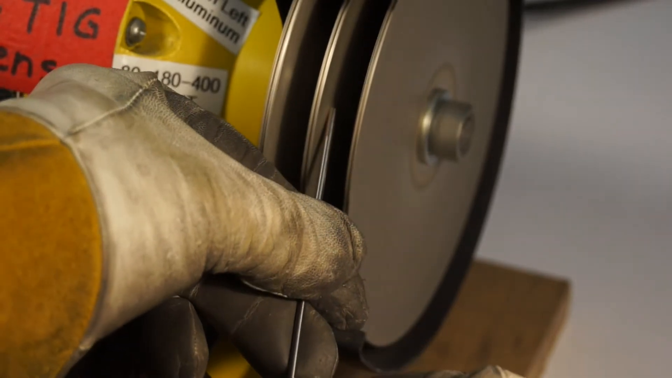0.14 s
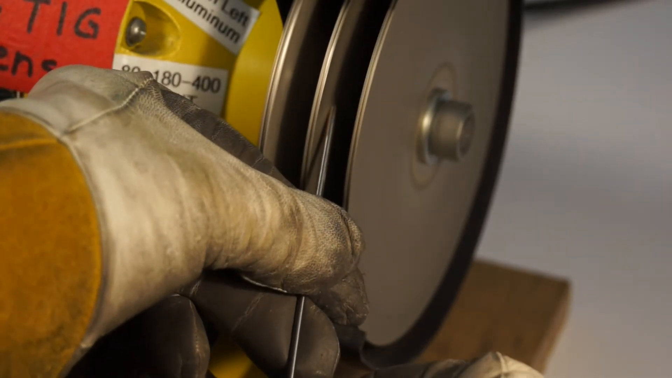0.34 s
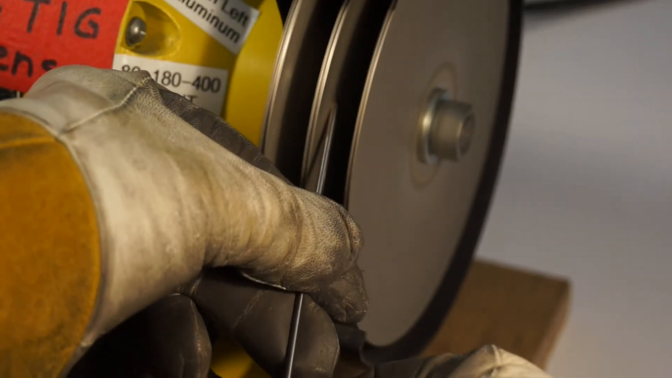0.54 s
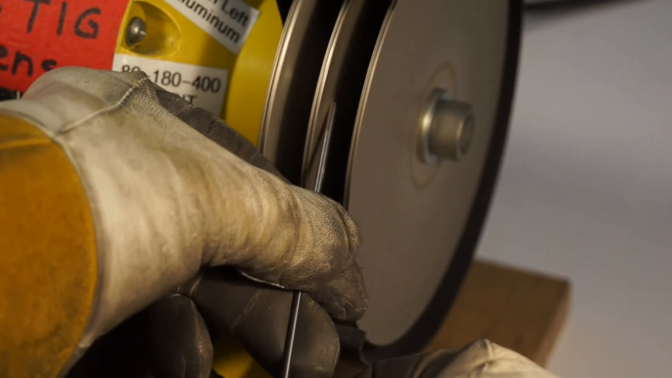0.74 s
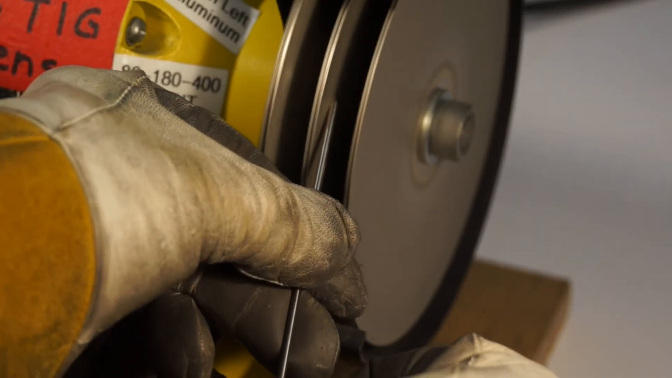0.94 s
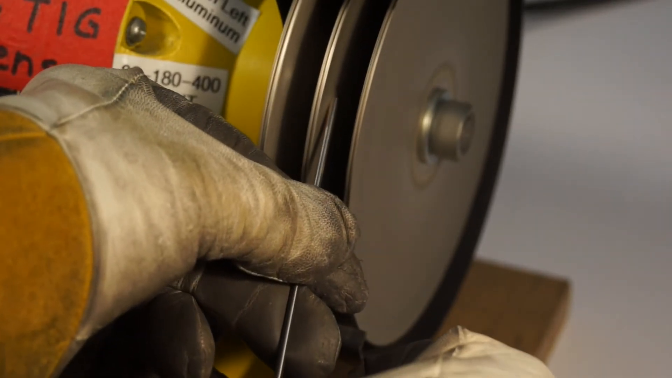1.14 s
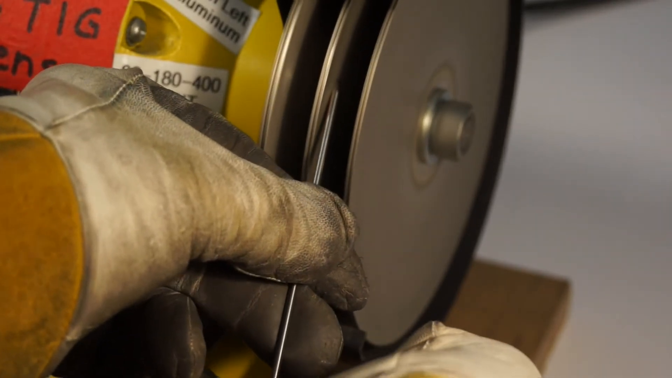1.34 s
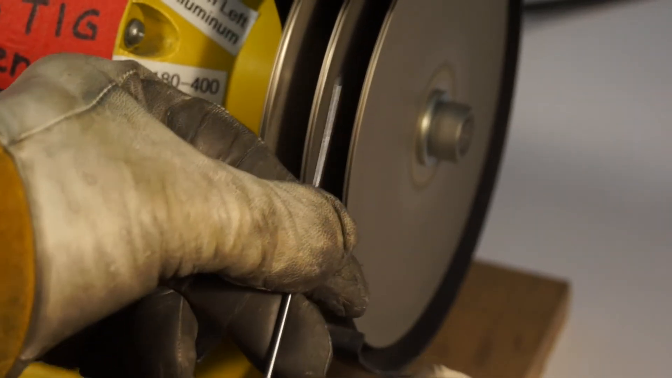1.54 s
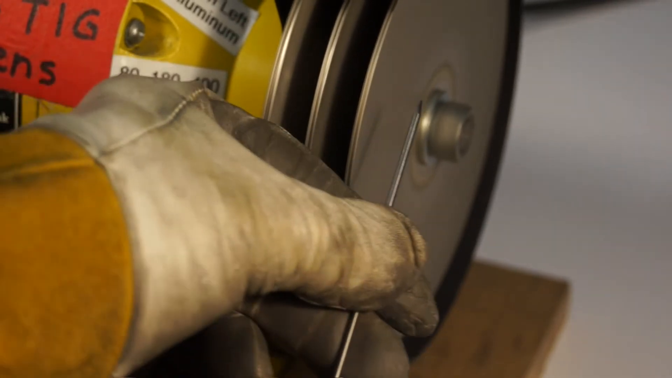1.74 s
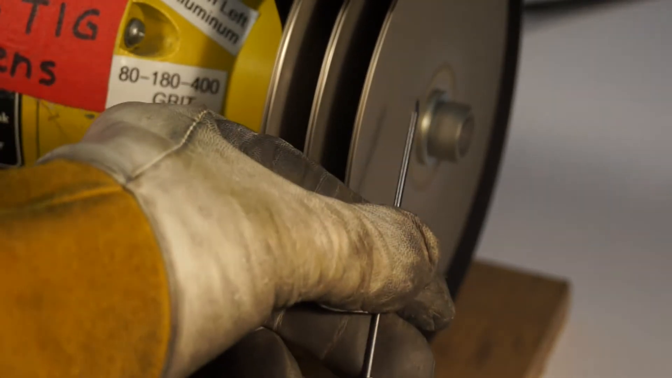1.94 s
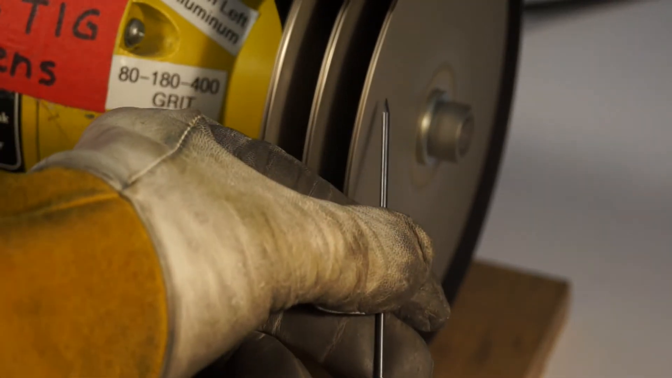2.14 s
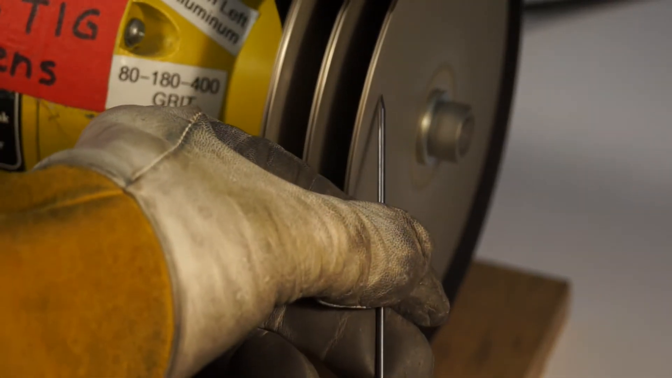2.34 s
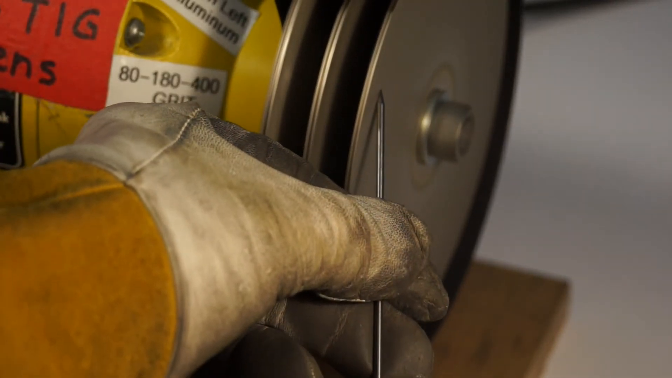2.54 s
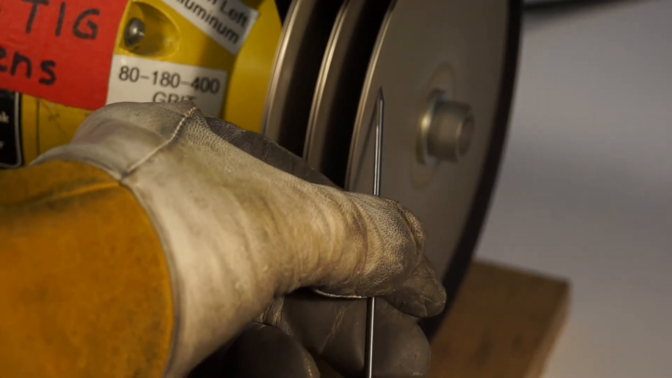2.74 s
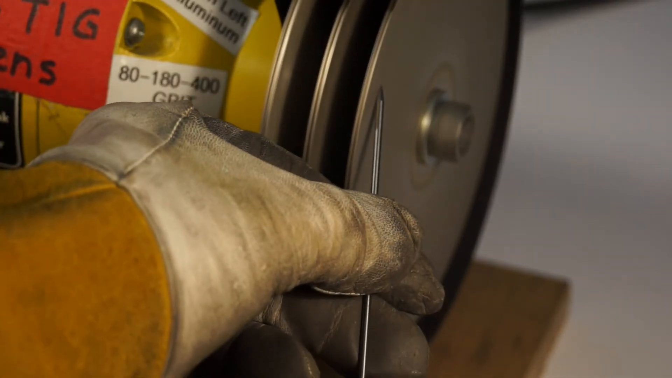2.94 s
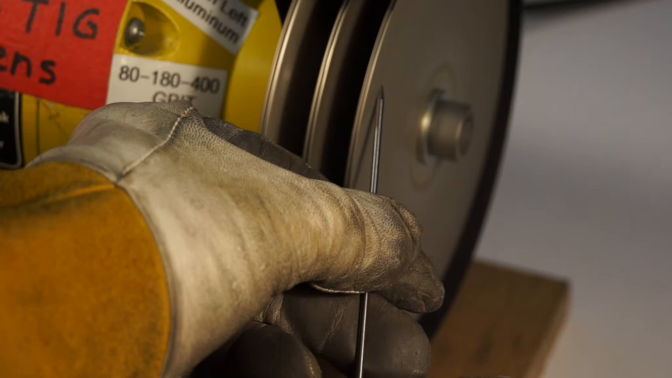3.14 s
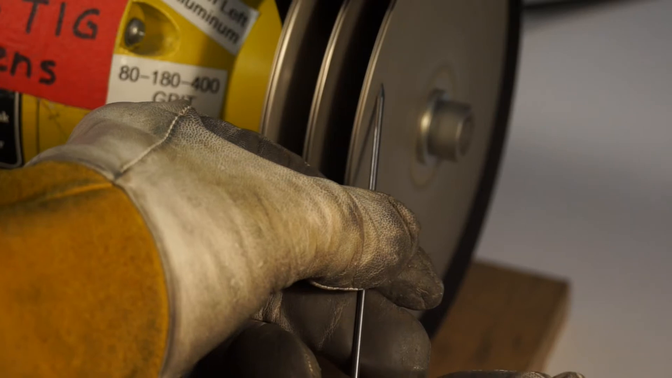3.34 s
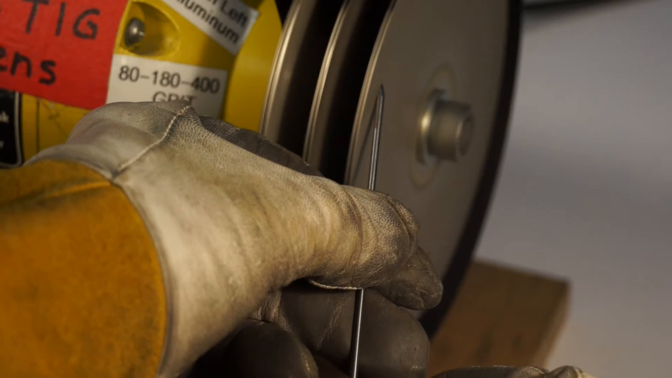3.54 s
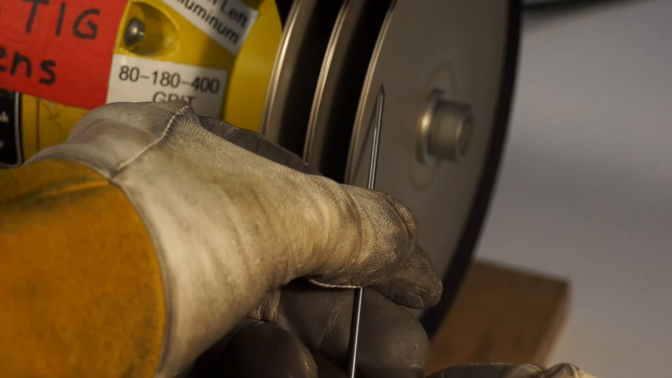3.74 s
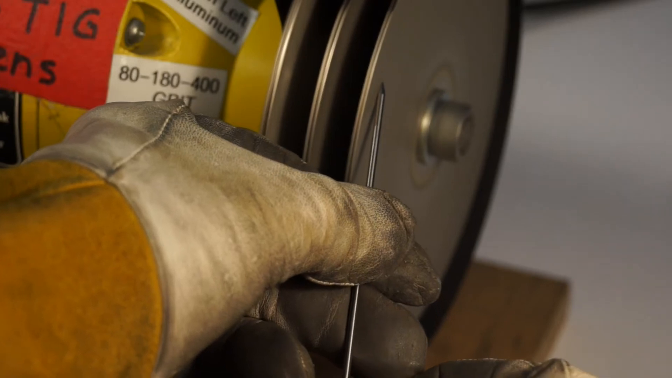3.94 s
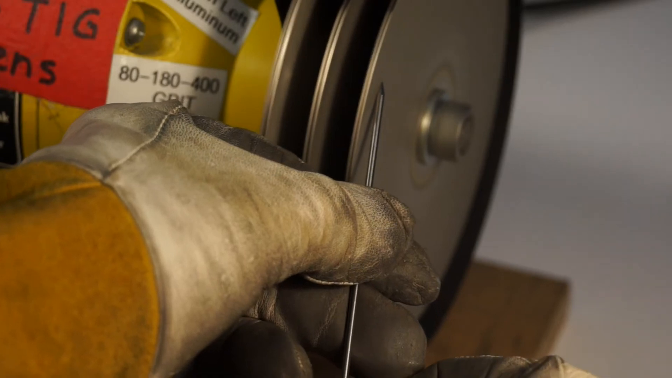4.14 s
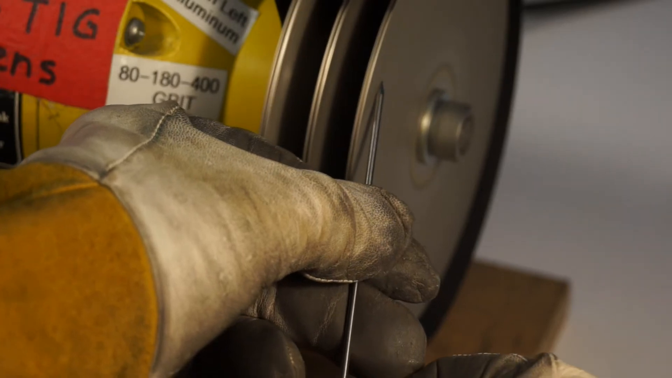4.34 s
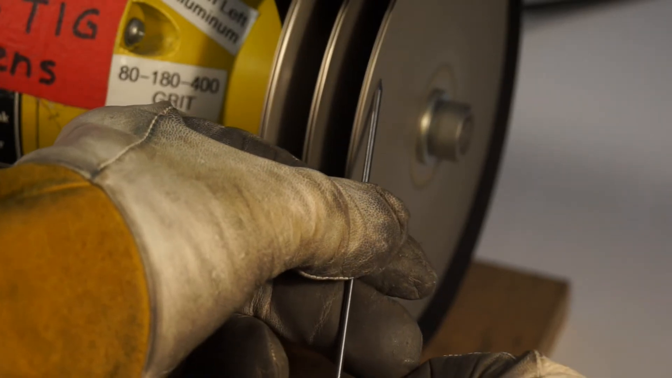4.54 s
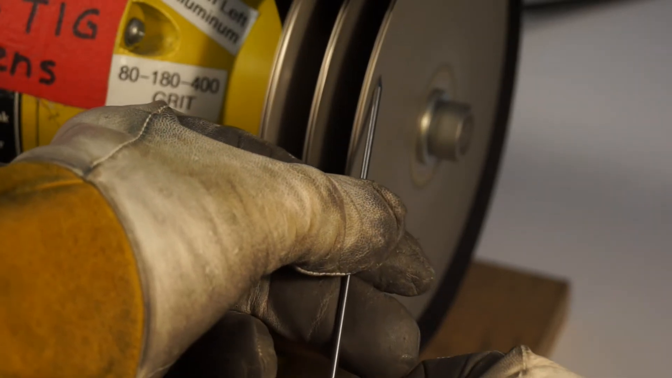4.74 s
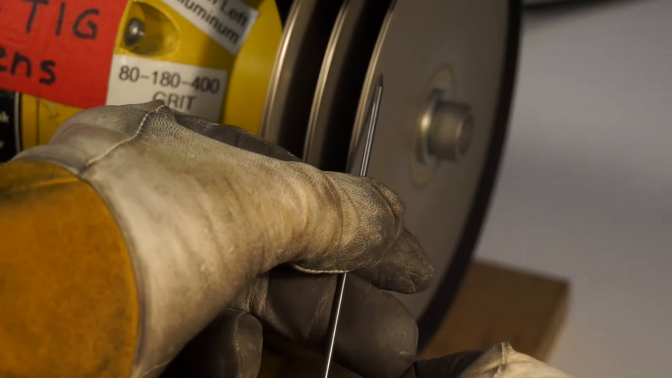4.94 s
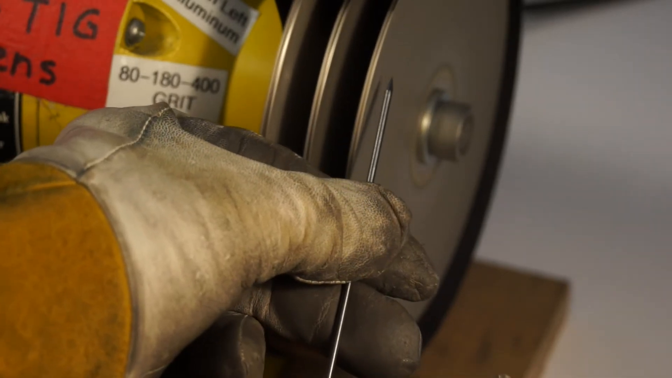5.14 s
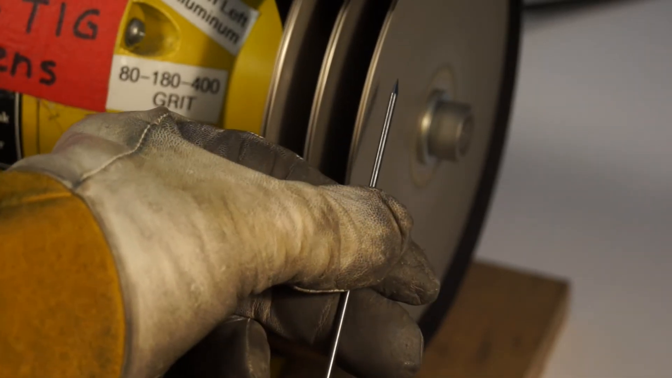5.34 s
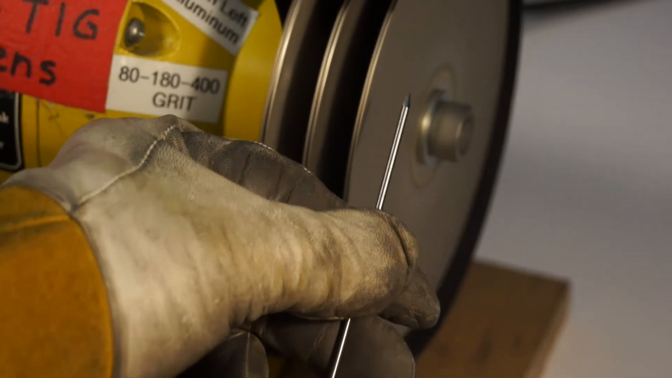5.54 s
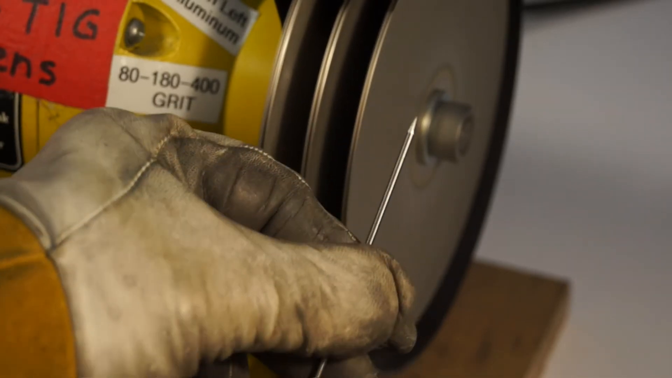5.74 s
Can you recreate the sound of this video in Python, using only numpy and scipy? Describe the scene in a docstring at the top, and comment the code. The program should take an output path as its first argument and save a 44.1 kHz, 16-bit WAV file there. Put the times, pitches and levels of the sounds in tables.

```python
"""Electrode on a bench grinder

A metal electrode is pressed twice against the diamond discs of a bench grinder, close to a camera.
Grits passing the tip on every turn force the rod's resonances; the motor hums, rocks and rattles.
Pressure slows the shaft, which calms the motor and quickens its beat against the mains hum.
The camera's gain control ducks under the loud grinding and creeps back up, so the motor swells."""
import sys
import numpy as np
from scipy import signal
from scipy.fft import rfft, irfft, next_fast_len
from scipy.io import wavfile
from scipy.ndimage import uniform_filter1d, map_coordinates

SR = 44100
rng = np.random.default_rng(int(sys.argv[2]) if len(sys.argv) > 2 else 0)


def to_wav(sig):
    """Store sig (one row per channel, or 1-D mono) as 16-bit WAV at the path in sys.argv[1].

    Samples outside -1..1 are clipped; the rate is SR.
    """
    pcm = np.clip(np.atleast_2d(sig), -1, 1) * 32767
    pcm = np.round(pcm).astype(np.int16)
    wavfile.write(sys.argv[1], SR, pcm.T)  # frames by channels


N = 255048
TIME = np.arange(N) / SR  # s

# Source levels are those ahead of the gain control.
# resonances of the rod in five holds: f/Hz, width/Hz, relative level/dB before SING_DB
PRESSED_HARD_MODES = [(4265, 230, -7.5), (4760, 259, -4.0), (6710, 60, 3.0), (8280, 130, 1.5),
                      (8775, 84, 2.5), (9245, 99, -0.5), (9820, 100, 2.0), (10255, 102, 1.5),
                      (10470, 82, 1.0), (11010, 80, 3.0), (11145, 37, 4.5), (11480, 69, 4.0),
                      (11685, 84, 3.0), (12600, 92, -1.5), (13420, 259, -3.5), (13585, 259, -5.0)]
EASED_MODES = [(4405, 259, -9.0), (6705, 85, 1.0), (7140, 54, -2.0), (7445, 113, -4.5), (8280, 46, 5.5),
               (10210, 121, -1.5), (10350, 54, -0.5), (10535, 143, 3.5), (11115, 64, 6.5),
               (11455, 120, -0.5), (11690, 55, 3.0), (12145, 90, -1.0), (13420, 103, 0.0),
               (13650, 107, -4.5), (13800, 52, 0.0), (14350, 105, -7.5)]
TOUCHING_MODES = [(4750, 72, -9.0), (6300, 57, -6.5), (7120, 30, 1.5), (7485, 56, -3.5), (7595, 31, 1.0),
                  (9015, 118, -1.0), (9065, 80, -5.0), (10075, 72, -2.5), (11195, 131, 1.0),
                  (11345, 68, -3.5), (11505, 40, 2.5), (11690, 46, -4.0), (12485, 65, 0.0),
                  (12770, 32, 1.5), (13440, 51, 2.0), (14370, 87, 0.0)]
SETTLED_MODES = [(7070, 115, -2.5), (7465, 106, 2.0), (7570, 44, 2.5), (8125, 41, 2.5), (8480, 73, -1.5),
                 (8825, 43, -1.5), (9050, 111, 4.0), (10095, 178, -3.0), (11250, 181, 4.0),
                 (11470, 58, 4.5), (11815, 259, -5.0), (12495, 88, 2.5), (12760, 57, 3.5),
                 (13415, 107, -1.0), (14345, 78, 3.5), (14520, 72, -1.0)]
LIFTING_MODES = [(4430, 50, -9.5), (4780, 80, -9), (5130, 90, -8), (5400, 130, -8), (6165, 73, -3.5),
                 (6615, 38, 5.0), (7140, 54, 3.0), (7455, 106, -3), (8550, 75, 0.5), (8975, 48, -0.5),
                 (9910, 192, -4.0), (11270, 31, 8.5), (11645, 78, -0.5), (12740, 93, 4.5),
                 (13400, 38, -1.5), (14030, 47, -0.5), (14240, 42, 5.5), (14345, 76, 7.0)]
# broad scrape under the resonances: f/Hz, relative spectral level/dB
FIRST_SCRAPE = [(700, -44), (1200, -38), (1570, -28), (1950, -69), (2330, -22), (2700, -41), (3400, -22),
                (4200, -9), (5300, -3.5), (8000, -1), (10500, -0.5), (12800, -2.5), (14000, -8.5),
                (15000, -11), (15600, -15)]
SECOND_SCRAPE = [(1500, -56), (3400, -29), (4300, -18.5), (5200, -13), (6500, -9.5), (9000, -10.5),
                 (11300, -8.5), (13800, -8), (15000, -36), (15600, -11.5)]
LAST_SCRAPE = [(1500, -43), (3300, -39), (3700, -9), (4200, -26), (4600, -16.5), (6500, -10.5), (9000, -7),
               (11300, -4.5), (13800, -14), (15000, -22), (15600, -5)]
# the successive holds: resonances, scrape
HOLDS = [(PRESSED_HARD_MODES, FIRST_SCRAPE), (EASED_MODES, FIRST_SCRAPE),
         (TOUCHING_MODES, SECOND_SCRAPE), (SETTLED_MODES, SECOND_SCRAPE), (LIFTING_MODES, LAST_SCRAPE)]
# the hand changes from one hold to the next: t/s at the middle, duration/s
HOLD_SHIFTS = [(0.732, .15), (1.998, .1), (3.313, 1), (4.714, 0.14)]
# the tip on the disc, first between the discs, then on the outer face: touch t/s, lift t/s,
# time to press in/s, time to ease off/s, level/dB, slackening/(dB/s), shaft slowing/(turns/s)
TIP_PASSES = [(-0.17, 1.44, 0.33, 0.135, -15.5, 1.9, 2.2), (2.497, 5.068, 0.6, 0.12, -27.5, -0.17, 0.53)]
# the run-out's last hard push in each pass: t/s
LAST_BUMPS = [1.421, 5.029]
# one resonance of the rod catches and squeals: start t/s, end t/s, f/Hz, level/dB
SQUEALS = [(-.05, 0.133, 6290, -25.5), (-.05, .16, 4740, -35), (0.283, 0.515, 6680, -28),
           (.82, 1.08, 8285, -30), (2.82, 3.14, 7000, -41.5), (3.09, 3.24, 6930, -38),
           (3.4, 4.126, 7560, -44), (4.75, 5.07, 14700, -51)]
# proud grains ping the tip once a turn: start t/s, end t/s, f/Hz, width/Hz, level/dB,
# place in the turn (0-1), roughness (0-1, from clean knocks to scratches)
CHATTERS = [(.3, .72, 4400, 200, -35, 0.67, .5), (0.397, 0.715, 5230, 400, -32, 0.25, .6),
            (2.7, 3.129, 4790, 220, -46, .25, 0.3), (2.696, 3.13, 5200, 300, -45.5, .22, 0.38),
            (3.065, 4.21, 4785, 130, -46.5, .3, .3), (3.46, 4.082, 5270, 260, -46.5, .3, .4),
            (4.02, 4.42, 5400, 200, -48.5, 0.2, .4), (4.624, 5.015, 7300, 600, -40.5, .9, 0.7),
            (4.71, 5.06, 5200, 1200, -55, .8, .9)]
# a resonance of the disc under the tip: t/s, f/Hz, level/dB
DISC_WHINE = [(.6, 1570, -75), (.75, 1570, -56), (1.1, 1560, -54), (1.33, 1500, -55), (1.45, 1425, -58)]
# housing tones: multiple of half the shaft speed (rounded for pitch), then
# level/dB running free, under light load, under heavy load
HOUSING_ORDERS = [(5, -58, -56, -57), (6, -57, -59.5, -59), (7, -60, -64.5, -72), (8, -50.5, -57.5, -63),
                  (9, -63, -55, -69), (10.1, -53.5, -53, -58.5), (11, -70, -76, -70), (12, -54, -59.5, -62),
                  (14, -52.5, -51, -59), (15, -59.5, -59, -67), (16, -54, -71.5, -69), (18, -66, -61, -66),
                  (19, -56.5, -59, -64), (20, -64, -67, -57), (21, -60.5, -61.5, -63), (22, -61, -73, -60),
                  (23, -63, -61.5, -75), (24, -60, -63.5, -80), (25, -62.5, -65.5, -59),
                  (36, -60, -79, -71)]
# slowing of the shaft at those three loads: (turns/s)
LOAD_SAG = [0.056, 0.46, 1.0]
# churning noise of housing and discs: f/Hz, relative spectral level/dB
CHURN_SPECTRUM = [(25, -19), (80, -11), (130, -7.5), (250, -6.5), (420, -0.5), (700, -2), (900, -4),
                  (1100, -2), (1350, -7), (1650, -6.5), (2000, -11.5), (3500, -13.5), (6500, -17),
                  (11000, -38), (15000, -44)]
# loose parts' chatter: f/Hz, relative spectral level/dB
RATTLE_SPECTRUM = [(1500, -4), (3700, 3.5), (5000, 2.5), (6700, 2.5), (8500, -2), (10500, -0.5),
                   (13000, -6), (15500, -41)]
# loudest ticks of the loose parts: onset t/s, level/dB at the peak
LOUD_TICKS = [(1.98, -45), (1.998, -44), (2.314, -41.5), (2.398, -46.5), (2.464, -44.5), (5.3, -46),
              (5.334, -45), (5.352, -45), (5.501, -45.5), (5.604, -45), (5.702, -48), (5.735, -49)]
# reverberation time of the room: f/Hz, t60/s
ROOM_T60 = [(100, 0.17), (1000, 0.18), (6000, 0.19), (15000, 0.27)]
# sound sent into the room: f/Hz, level/dB
ROOM_SEND = [(60, -18), (250, -16), (550, -6), (1200, -6), (2500, -8), (5000, -17), (9000, -9), (15000, -9)]
# left minus right microphone: f/Hz, level/dB
BALANCE = [(60, 2.5), (250, 0.4), (1000, 1.5), (2000, 0), (8000, -0.2), (13000, -0.5)]
# phase by which the left microphone leads: f/Hz, phase/rad
LEAD = [(0, 0), (260, -0.26), (1380, 0.021), (1890, -0.46), (6370, -0.68), (7580, 0.66), (8270, 0.61),
        (8960, -1.05), (9220, -0.41), (11500, -0.0032), (12100, 0.36), (12700, -0.4), (13100, -0.53),
        (15500, -0.32)]

# shaft; INERTIA_S is the time constant of its lag behind the load
FREE_TURNS_PER_S, INERTIA_S = 59.68, 0.1503
# tip on the disc
CONTACT_S = 0.02  # time in which the tip meets or leaves the disc
LIGHT_TOUCH_DB = -10  # first and last contact against full pressure
SWING_DB, LIGHT_SWING_DB = 0, 4  # once-a-turn swing at full pressure and at a light touch
# rod; unsteady fingers vary each resonance by these standard deviations
SING_DB = 2.5  # lift of the resonances over the scrape
TREMBLE_DB, TREMBLE_HZ = 1.5, 5.6
SHIMMER_DB, SHIMMER_SPACING_HZ = 3.0, 750  # once-a-turn swing of each group of resonances
SHIMMER_DRIFT = 1.0  # rad
SQUEAL_WIDTH_HZ, SQUEAL_FADE_S = 27, 0.059
CHATTER_FADE_S, CHATTER_SCATTER_DB = 0.073, 0.8
SCRATCH_DECAY_TURNS = 0.11
# disc
WHINE_WIDTH_HZ = 110
RING_START_S, RING_END_S, RING_FADE_S = 1.35, 1.49, 0.036
RING_HZ, RING_DB = 1422, -46.5  # median amplitude while held
# motor: level/dB without slowing, drop/dB per turn per second of slowing
UNBALANCE, CHURNING, ROTOR = (-63.5, 1.5), (-43.5, 3.2), (-55.5, 0.5)
MAINS_HZ, MAINS_DB = 120, -66  # hum of the windings
BEAT_DIP_S = 1.81  # a moment when hum and rotor tone are opposed
WAVER_PER_ORDER = 0.024  # rad of flutter per order: higher tones are the more broken
# loose parts chatter harder once the shaft is back at speed
RATTLE_START_S, RATTLE_BEFORE_DB, RATTLE_DB = 1.84, -56.5, -52
SMALL_TICK_SHARE, SMALL_TICK_DB = 0.33, -49  # share of later rocking cycles that add a faint tick
TICK_PEAK_S = 0.0037
TOP_HZ = 15820  # band limit


def amp(db):
    """Logarithmic level: converts decibels to amplitude gain."""
    return 10 ** (np.asarray(db) / 20)


def unit(x):
    """Normalisation: scales a signal to rms 1."""
    return x / np.sqrt(np.mean(x ** 2) + 1e-20)


def along(points, hz):
    """Logarithmic interpolation: reads (f/Hz, value) points at any frequency."""
    f, value = np.transpose(points)
    return np.interp(np.log(hz + 1), np.log(f), value)


def wobble(rate):
    """Slow random modulation: a smooth curve through random knots, rate of them a second."""
    knots = rng.standard_normal(int(N * rate / SR) + 4)
    return map_coordinates(knots, [TIME * rate])


def filtered(x, gain):
    """Linear filtering: multiplies the spectrum by a function of frequency."""
    size = next_fast_len(N + 8192)
    hz = np.fft.rfftfreq(size, 1 / SR)
    return irfft(rfft(x, size) * gain(hz), size)[..., :N]


def noise(spectrum):
    """Coloured noise: white noise shaped by a spectral envelope, at rms 1."""
    return unit(filtered(rng.standard_normal(N), lambda hz: amp(along(spectrum, hz))))


def pulses(times, heights, size=16):
    """Band-limited impulses: windowed sincs that may fall between samples."""
    at = times[:, None] * SR
    index = np.floor(at).astype(int) + np.arange(1 - size // 2, 1 + size // 2)
    shape = np.sinc(index - at) * np.cos(np.pi * (index - at) / size) ** 2
    inside = (index >= 0) & (index < N)
    return np.bincount(index[inside], (heights[:, None] * shape)[inside], N)


def ramp(start, length):
    """Linear onset: rises from 0 to 1 over length seconds."""
    return np.clip((TIME - start) / length, 0, 1)


def spell(start, end, fade):
    """Trapezoidal envelope: fades in, holds at 1 and fades out."""
    return ramp(start, fade) * (1 - ramp(end - fade, fade))


def resonance(force, hz, width_hz):
    """Damped oscillation: one mode driven by a force, at rms 1; its bandwidth sets the decay."""
    t = TIME[:SR // 10]
    response = np.sin(2 * np.pi * hz * t) * np.exp(-np.pi * width_hz * t)
    return unit(signal.fftconvolve(force, response)[:N])


def hand():
    """Contact loading: light touch, pressing in, slackening and easing off set force and braking."""
    strength = lightness = braking = 0
    for touch, lift, press_s, ease_s, db, slackening_db, slowing in TIP_PASSES:
        contact = spell(touch, lift, CONTACT_S)
        light = 1 - ramp(touch, press_s) * (1 - ramp(lift - ease_s, ease_s))
        slack_db = slackening_db * np.maximum(TIME - touch - press_s, 0)
        push = contact * amp(LIGHT_TOUCH_DB * light - slack_db)
        strength = strength + amp(db) * push
        lightness = lightness + contact * light
        braking = braking + slowing * push
    return strength, lightness, braking


def shaft(braking):
    """Rotational inertia: speed follows the load with a lag; returns loss of speed and angle in turns."""
    keep = np.exp(-1 / (INERTIA_S * SR))
    sag = signal.lfilter([1 - keep], [1, -keep], braking, zi=[braking[0] / 2])[0]
    speed = (FREE_TURNS_PER_S - sag) * (1 + 0.000241 * wobble(8))
    return sag, np.cumsum(speed) / SR


def grit(turns, memory, spread_db, count):
    """Cyclic excitation: the same diamonds strike each turn, their bite changing as the tip creeps."""
    laps = np.arange(-1, 350)[:, None]
    place = laps + (np.arange(count) + rng.random(count)) / count
    draw = rng.standard_normal((2, len(laps) + 40, count))  # 40 laps let the memory settle
    carried = signal.lfilter([np.sqrt(1 - memory ** 2)], [1, -memory], draw, axis=1)
    bite, height = carried[:, -len(laps):]
    strength = np.tanh(2 * bite) * amp(spread_db * np.minimum(height, 2))
    passing = (place > 0) & (place < turns[-1])
    return unit(pulses(np.interp(place[passing], turns, TIME), strength[passing]))


def rod(modes, scrape, hz):
    """Modal superposition: Lorentzian resonances over a broad scrape, a little different each time."""
    power = amp(along(scrape, hz)) ** 2
    for (centre, width, db), (drift, swell) in zip(modes, rng.standard_normal((len(modes), 2))):
        detuning = 2 * (hz - centre - TREMBLE_HZ * drift) / width
        power = power + amp(db + SING_DB + TREMBLE_DB * swell) ** 2 / (1 + detuning ** 2)
    return power / power.mean()


def causal(power):
    """Minimum phase: folds the cepstrum to find the ringing that has this power response."""
    cepstrum = irfft(np.log(power) / 2)
    half = len(cepstrum) // 2
    cepstrum[1:half] *= 2
    cepstrum[half + 1:] = 0
    return irfft(np.exp(rfft(cepstrum)))


def held_rod(force, size=4096):
    """Time-varying resonance: each short stretch of force rings the rod as held at that moment."""
    hz = np.fft.rfftfreq(size, 1 / SR)
    force = np.pad(force, (size, 2 * size))
    out = np.zeros(N + 4 * size)
    window = np.hanning(2 * size)
    for at in range(0, N + size, size):
        shifts = [np.clip((at / SR - s) / length + .5, 0, 1) for s, length in HOLD_SHIFTS]
        shifted = [1] + shifts + [0]
        shares = [max(a - b, 0) for a, b in zip(shifted, shifted[1:])]
        power = sum(share * rod(*hold, hz) for share, hold in zip(shares, HOLDS))
        ring = signal.fftconvolve(force[at:at + 2 * size] * window, causal(power))
        out[at:at + len(ring)] += ring
    return unit(out[size:size + N])


def shimmer(x, turns):
    """Periodic contact modulation: each group of resonances swells at its own moment of the turn."""
    out = 0
    for centre in np.arange(0, TOP_HZ + SHIMMER_SPACING_HZ, SHIMMER_SPACING_HZ):
        band = filtered(x, lambda hz: np.maximum(1 - np.abs(hz - centre) / SHIMMER_SPACING_HZ, 0))
        moment = 2 * np.pi * rng.random() + SHIMMER_DRIFT * wobble(2.04)
        out = out + band * amp(SHIMMER_DB * np.cos(2 * np.pi * turns + moment))
    return unit(out)


def grinding(turns, strength, lightness):
    """Forced vibration: grit drives the rod; run-out swings the pressure, most at a light touch."""
    swing_db = SWING_DB + (LIGHT_SWING_DB - SWING_DB) * lightness
    high_point = np.where(TIME < TIP_PASSES[1][0], *np.interp(LAST_BUMPS, TIME, turns))
    pressure = amp(swing_db * np.cos(2 * np.pi * (turns - high_point)))
    pressure /= np.sqrt(np.i0(swing_db * np.log(10) / 10))  # the swing leaves the mean power alone
    force = grit(turns, memory=0.86, spread_db=3.6, count=180)
    return strength * shimmer(held_rod(force * pressure), turns)


def squeals():
    """Selective resonance: now and then random grit force sets a single mode of the rod singing."""
    out = 0
    for start, end, hz, db in SQUEALS:
        mode = resonance(rng.standard_normal(N), hz, SQUEAL_WIDTH_HZ)
        out = out + amp(db) * spell(start, end, SQUEAL_FADE_S) * mode
    return out


def tones(turns, sag, sway_db):
    """Order spectrum: lines on multiples of half the shaft speed, weighted by the load."""
    out = 0
    for order, *levels in HOUSING_ORDERS:
        level = amp(np.interp(sag, LOAD_SAG, levels) + sway_db * wobble(4.885))
        flutter = 2 * np.pi * rng.random() + WAVER_PER_ORDER * order * wobble(14)
        out = out + np.sqrt(2) * level * np.sin(np.pi * round(order) * turns + flutter)
    return out


def beating(turns, sag):
    """Interference: the rotor's twice-a-turn tone beats with the mains hum, faster as the shaft slows."""
    slip = MAINS_HZ * TIME - 2 * turns
    slip = slip - np.interp(BEAT_DIP_S, TIME, slip)
    rotor = unit(np.sin(4 * np.pi * turns))
    mains = unit(np.sin(2 * np.pi * (2 * turns + slip)))
    free_db, drop_db = ROTOR
    return amp(free_db - drop_db * sag + 1.5 * wobble(3.7)) * rotor - amp(MAINS_DB) * mains


def motor(turns, sag):
    """Rotating unbalance: hum and churning noise calm under load; the housing rocks every two turns."""
    unbalance_db, churn_db = [free_db - drop_db * sag for free_db, drop_db in (UNBALANCE, CHURNING)]
    rock_db = 1.0 * np.cos(np.pi * turns)
    turn_db = 0.84 * np.cos(2 * np.pi * turns)
    half_turn_db = 1.0 * np.cos(4 * np.pi * turns)
    throb = unit(amp(rock_db + turn_db + half_turn_db))
    unbalance = amp(unbalance_db + 1.2 * wobble(8)) * unit(np.sin(2 * np.pi * turns))
    churn = amp(churn_db) * throb * noise(CHURN_SPECTRUM)
    return unbalance + tones(turns, sag, sway_db=1.0) + beating(turns, sag) + churn


def rattle(turns):
    """Impact noise: loose parts chatter with the two-turn rocking, and now and then tick harder."""
    level_db = np.where(TIME < RATTLE_START_S, RATTLE_BEFORE_DB, RATTLE_DB)
    size = amp(level_db) * unit(amp(2.2 * np.cos(np.pi * turns) + 2.2 * wobble(25)))
    rocks = np.interp(np.arange(0, turns[-1], 2), turns, TIME)
    ticking = (rocks > RATTLE_START_S) & (rng.random(len(rocks)) < SMALL_TICK_SHARE)
    small_ticks = [(s, SMALL_TICK_DB) for s in rocks[ticking]]
    for s, db in LOUD_TICKS + small_ticks:
        age = np.maximum(TIME - s, 0) / TICK_PEAK_S
        size = size + amp(db) * age * np.exp(1 - np.minimum(age, 20))  # swells fast, dies slower
    return size * noise(RATTLE_SPECTRUM)


def high_spot(turns):
    """Impulsive excitation: proud grains knock and scratch the tip once a turn, ringing a rod mode."""
    out = 0
    for start, end, hz, width_hz, db, place, rough in CHATTERS:
        times = np.interp(np.arange(int(turns[-1])) + place, turns, TIME)
        knocks = pulses(times, amp(CHATTER_SCATTER_DB * rng.standard_normal(len(times))))
        scratch = np.exp(-((turns - place) % 1) / SCRATCH_DECAY_TURNS) * rng.standard_normal(N)
        clean_ping = resonance(knocks, hz, width_hz)
        rough_ping = resonance(scratch, hz, width_hz)
        ping = (1 - rough) * clean_ping + rough * rough_ping
        ping = unit(filtered(ping, lambda f: 1 / (1 + ((f - hz) / (2 * width_hz)) ** 4)))
        out = out + amp(db) * spell(start, end, CHATTER_FADE_S) * ping
    return out


def disc_whine(turns):
    """Harmonic excitation: shaft harmonics drive a disc resonance, which sinks as pressure eases."""
    when, pitches, levels = np.transpose(DISC_WHINE)
    hz, db = np.interp(TIME, when, pitches), np.interp(TIME, when, levels)
    speed = np.gradient(turns) * SR
    lines = 0
    for k in range(23, 30):
        detuning = (k * speed - hz) / WHINE_WIDTH_HZ * 2
        lines = lines + np.sin(2 * np.pi * (k * turns + rng.random())) / np.sqrt(1 + detuning ** 2)
    return spell(when[0], RING_END_S, RING_FADE_S) * amp(db) * unit(lines)


def disc_ring():
    """Plate resonance: the disc sings briefly and unsteadily as the rod slides off it."""
    level = spell(RING_START_S, RING_END_S, RING_FADE_S) * amp(RING_DB + 2.4 * wobble(65.0))
    waver = 1.2 * wobble(80)  # rad
    return level * np.sin(2 * np.pi * RING_HZ * TIME + waver)


def workshop(x):
    """Diffuse reverberation: a short decaying noise tail, different at each microphone."""
    hz, t, z = signal.stft(rng.standard_normal((2, SR // 3)), SR, nperseg=256)
    t60 = along(ROOM_T60, hz)[:, None]
    tail = signal.istft(z * amp(-60 * t / t60) / np.sqrt(t60), SR, nperseg=256)[1]
    send = filtered(x, lambda f: amp(along(ROOM_SEND, f)))
    return signal.fftconvolve(send[None], tail / np.linalg.norm(tail[0]), axes=1)[:, :N]


def microphones(hz):
    """Interchannel difference: level and phase of the left and right capsule."""
    half = np.array([[.5], [-.5]])
    return amp(half * along(BALANCE, hz)) * np.exp(1j * half * along(LEAD, hz))


def scene():
    """Mechanical coupling: pressure sets the grinding and brakes the shaft, whose angle times the rest."""
    strength, lightness, braking = hand()
    sag, turns = shaft(braking)
    rod_sound = grinding(turns, strength, lightness) + squeals() + high_spot(turns)
    disc_sound = disc_whine(turns) + disc_ring()
    near = rod_sound + disc_sound + motor(turns, sag) + rattle(turns)
    return filtered(near + workshop(near), microphones)


def gain_control(x, target_db, recovery_db):
    """Dynamic compression: gain drops at once under a loud sound, then climbs recovery_db a second."""
    power = np.abs(uniform_filter1d(np.mean(x ** 2, axis=0), SR // 10))
    allowed_db = target_db - 10 * np.log10(power + 1e-12)
    climb_db = recovery_db * TIME
    return x * amp(np.minimum.accumulate(allowed_db - climb_db) + climb_db)


def record(dry):
    """Levelling and band limitation: the camera keeps nothing above its band limit."""
    levelled = gain_control(dry, target_db=-13, recovery_db=7.0)
    return filtered(levelled, lambda hz: hz < TOP_HZ)


dry = scene()
out = record(dry)
to_wav(out)
```